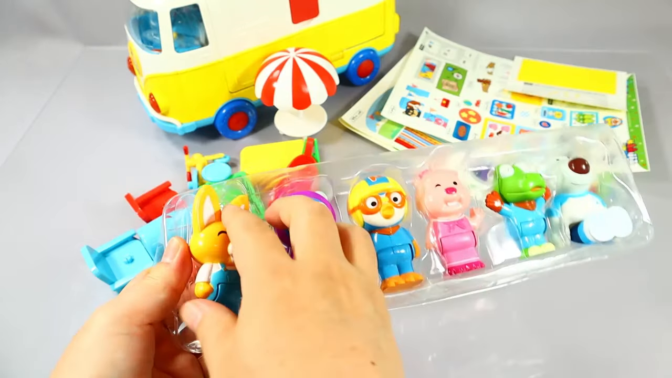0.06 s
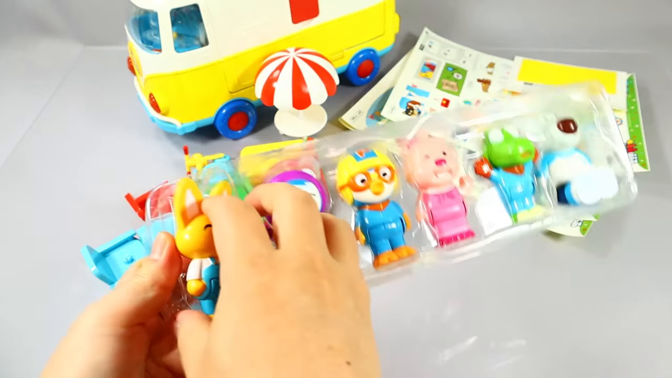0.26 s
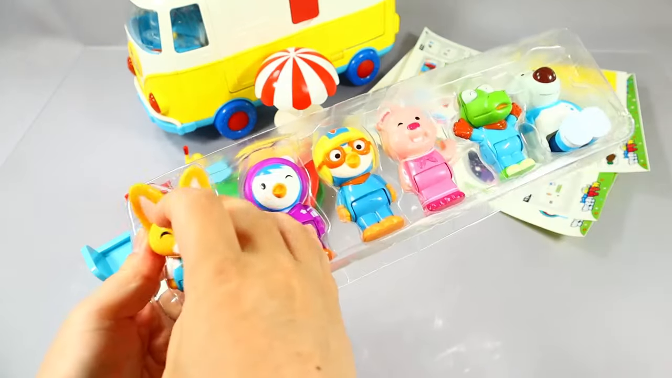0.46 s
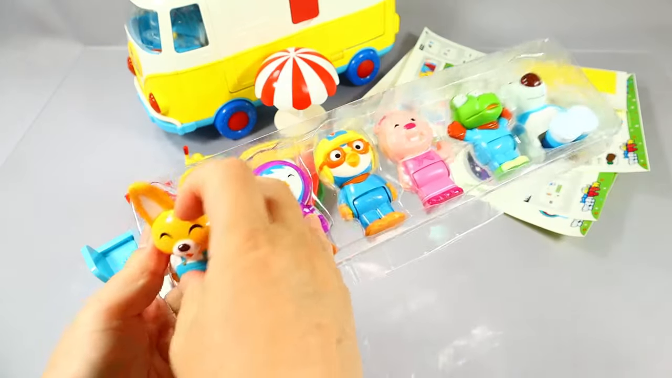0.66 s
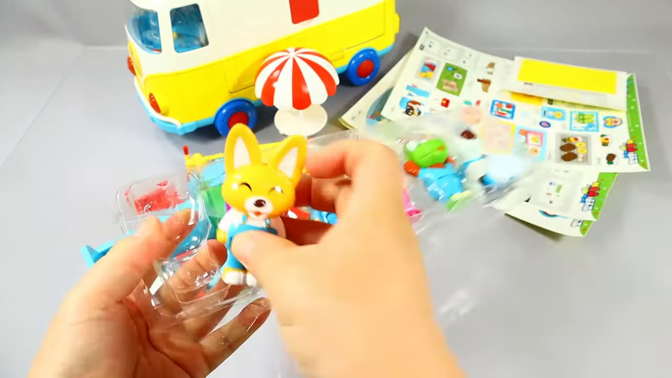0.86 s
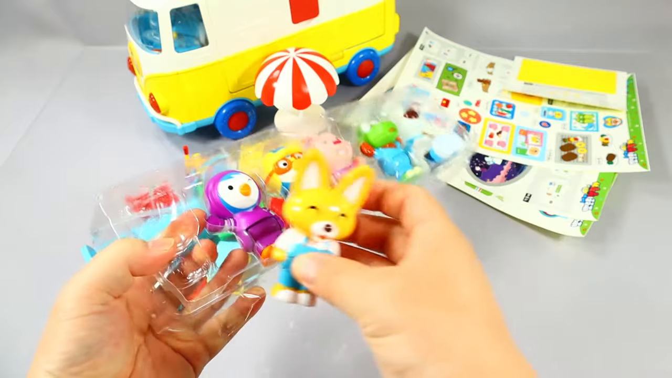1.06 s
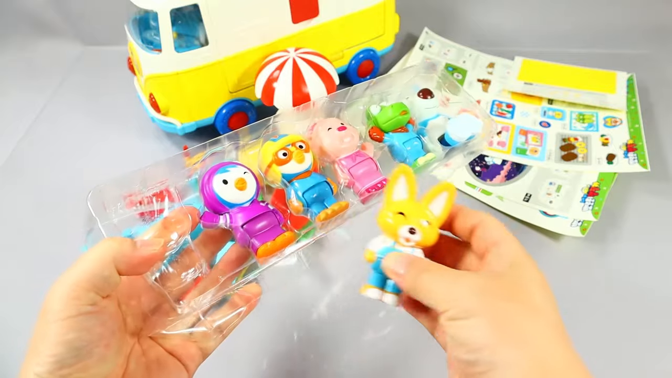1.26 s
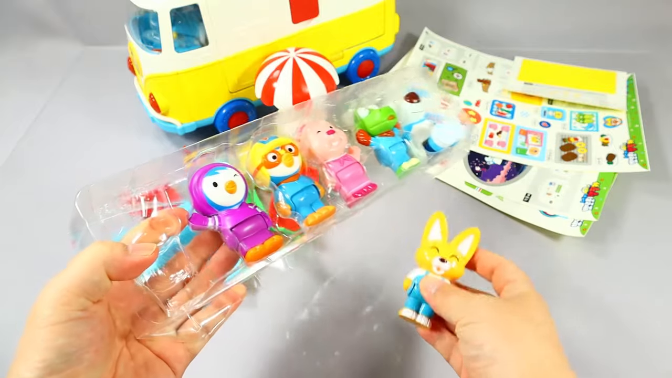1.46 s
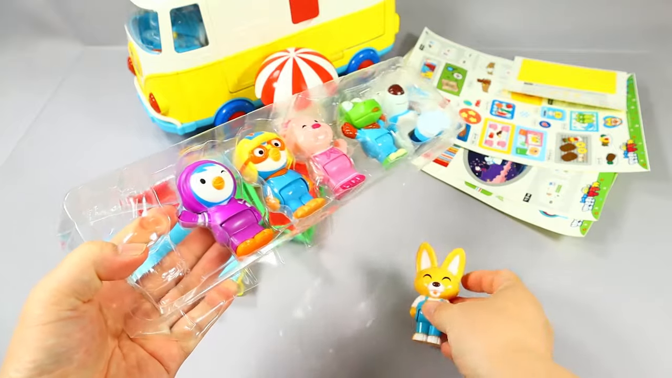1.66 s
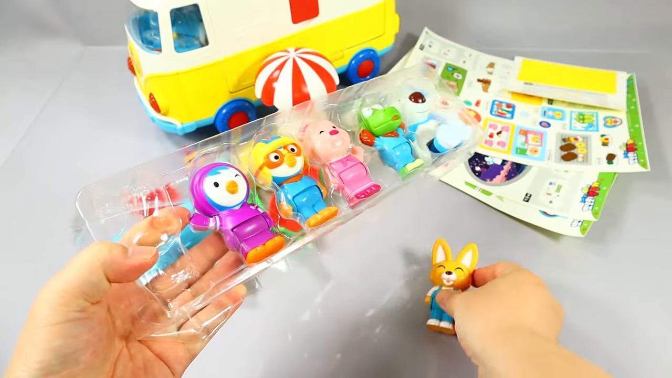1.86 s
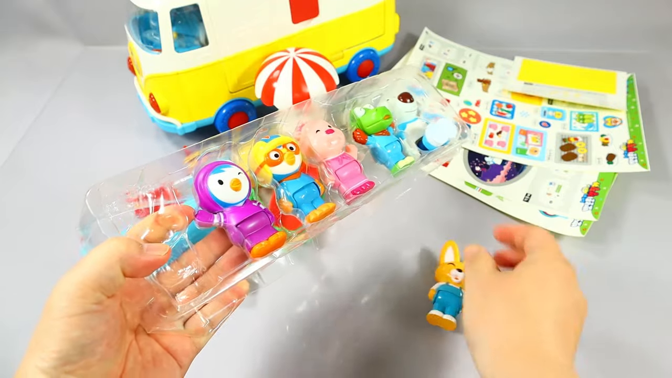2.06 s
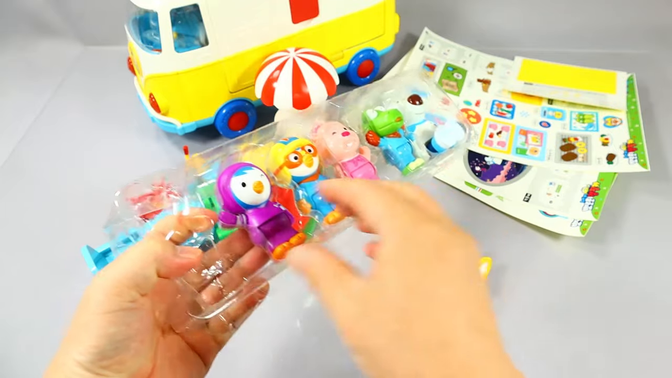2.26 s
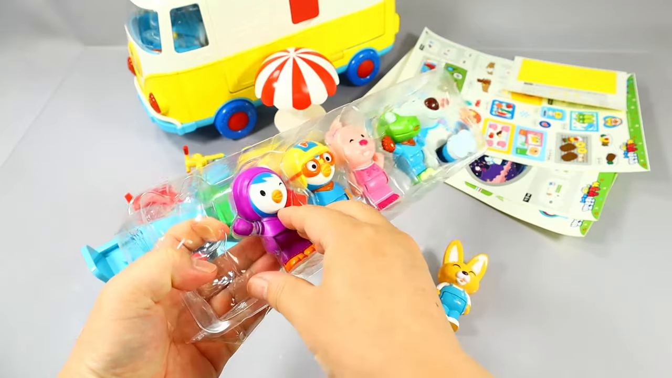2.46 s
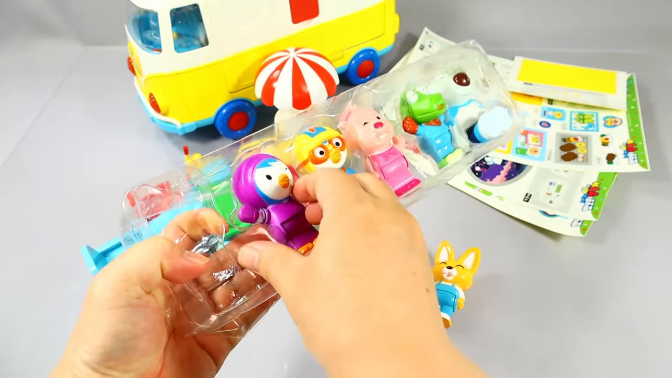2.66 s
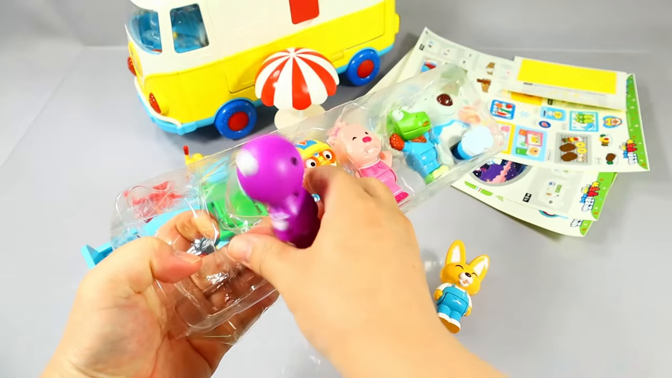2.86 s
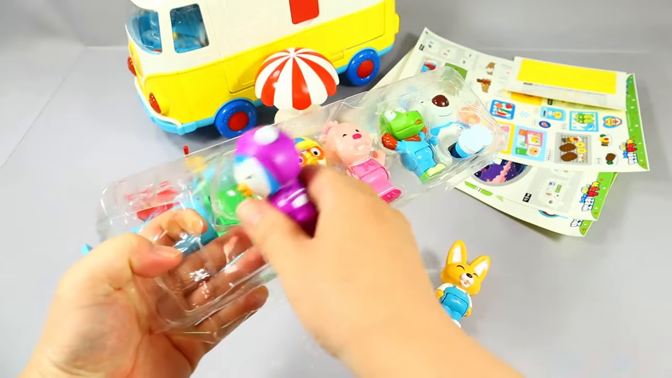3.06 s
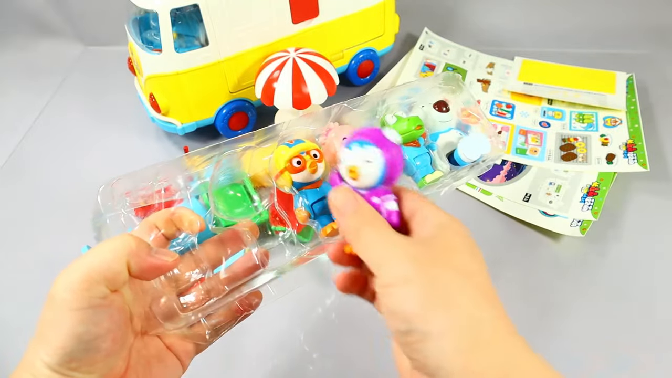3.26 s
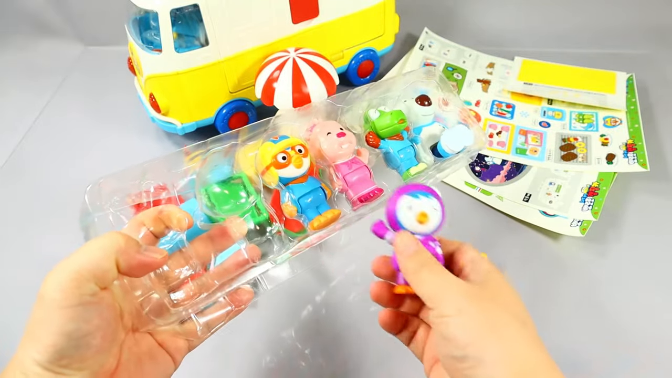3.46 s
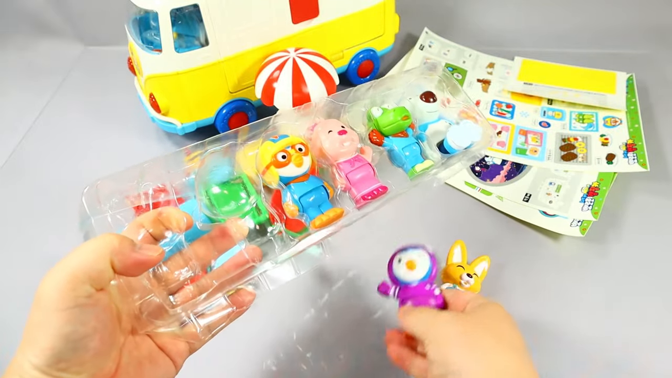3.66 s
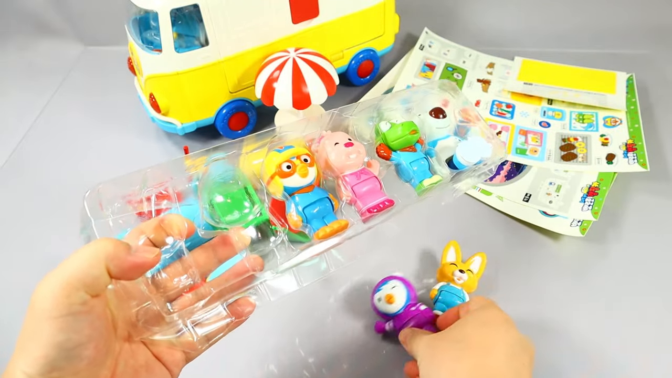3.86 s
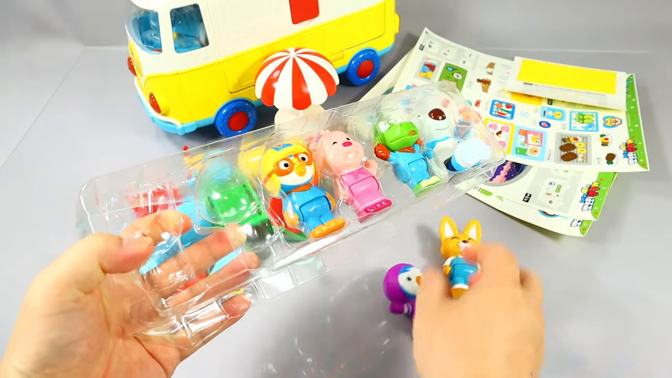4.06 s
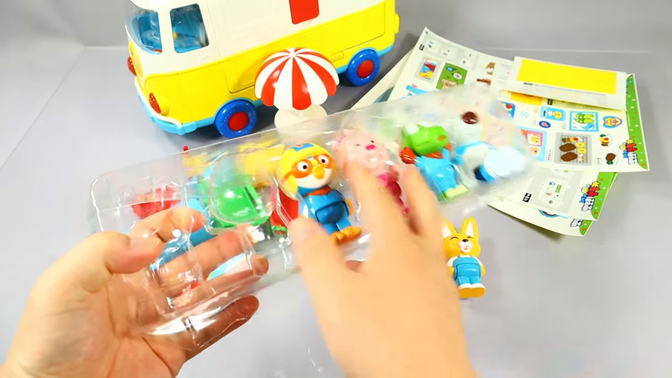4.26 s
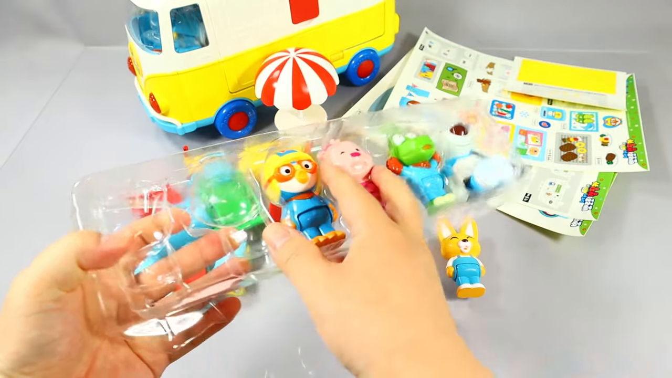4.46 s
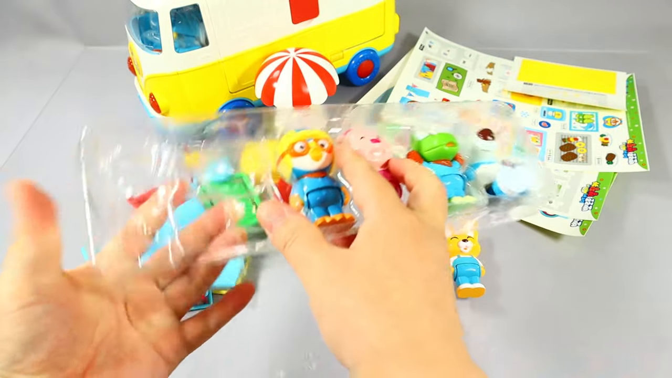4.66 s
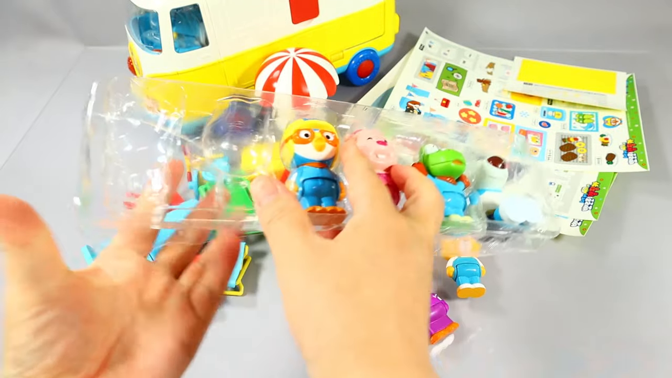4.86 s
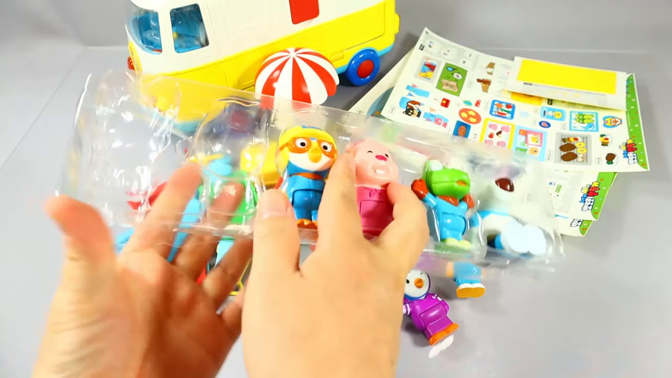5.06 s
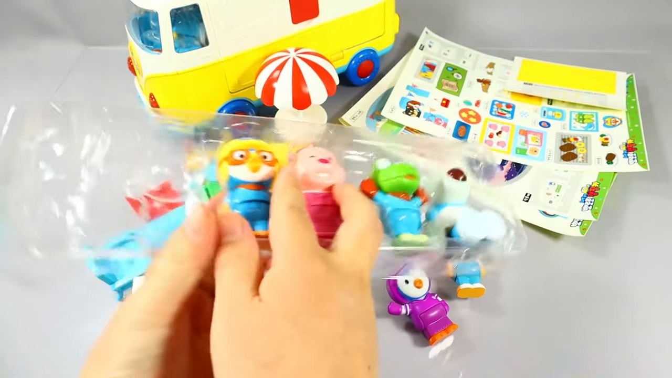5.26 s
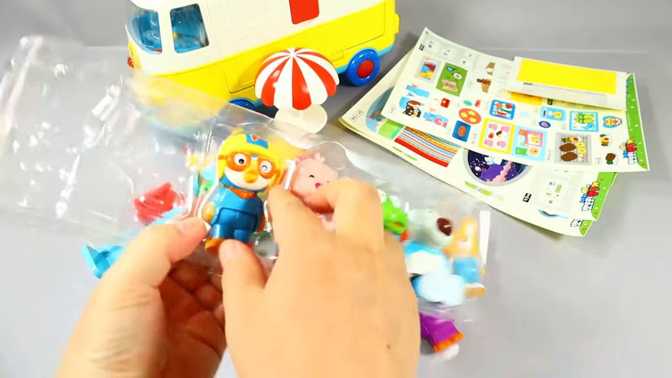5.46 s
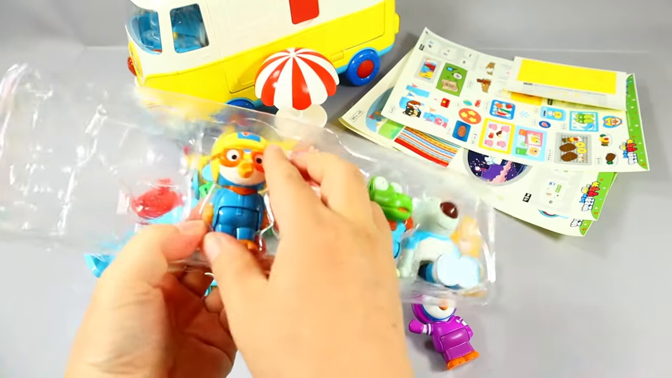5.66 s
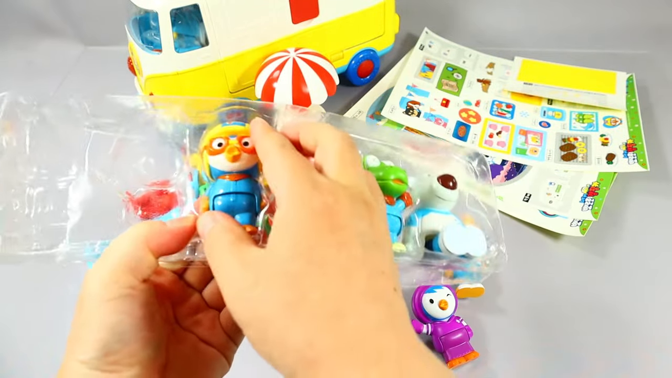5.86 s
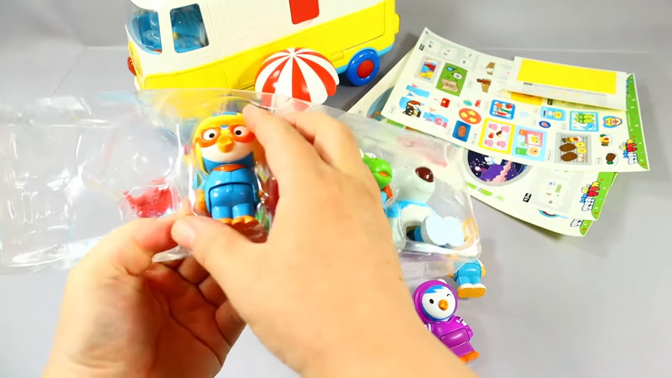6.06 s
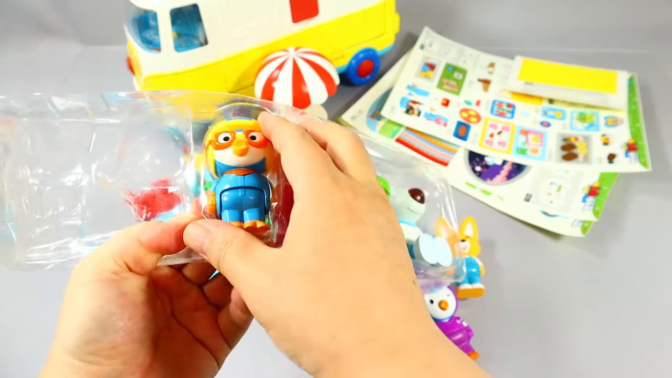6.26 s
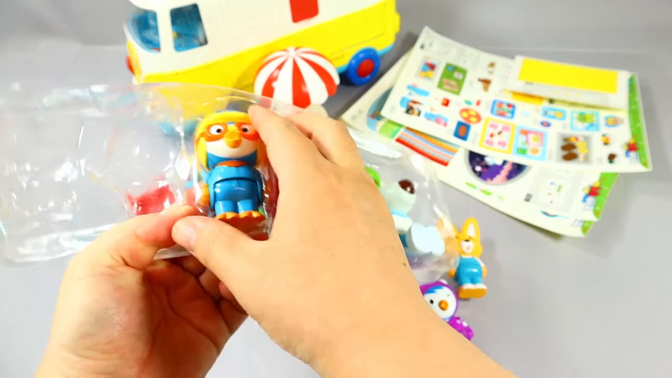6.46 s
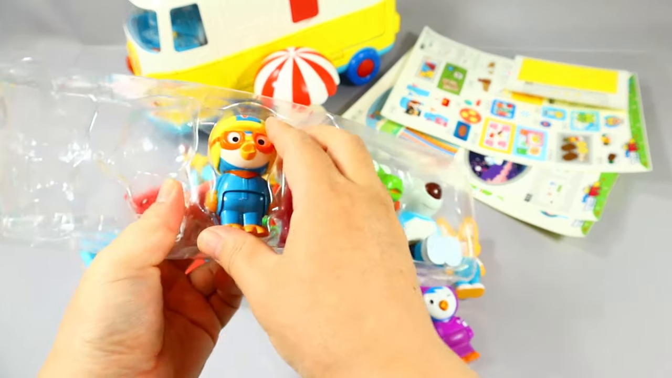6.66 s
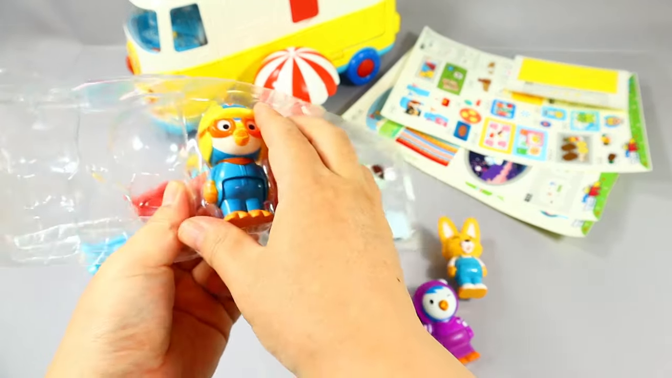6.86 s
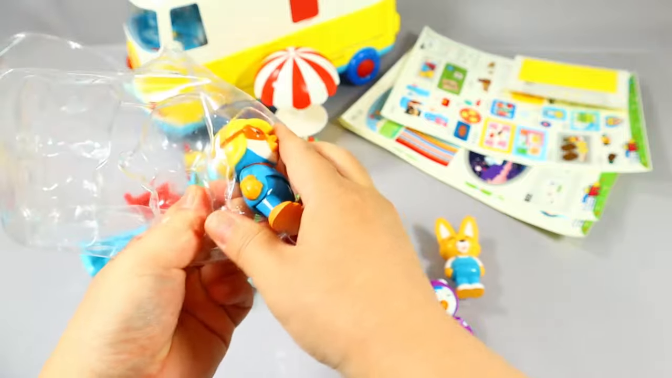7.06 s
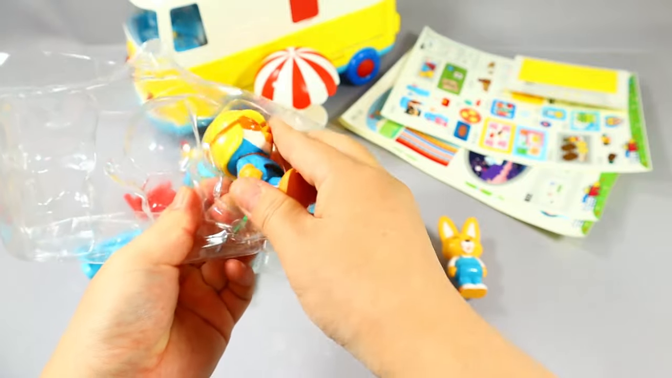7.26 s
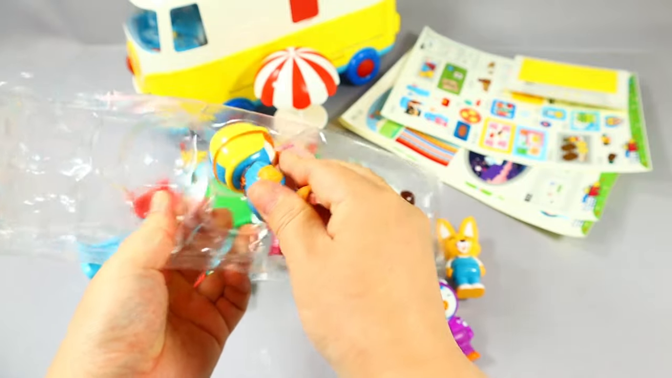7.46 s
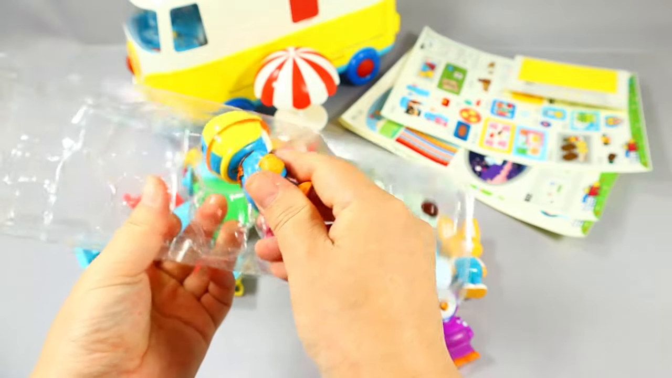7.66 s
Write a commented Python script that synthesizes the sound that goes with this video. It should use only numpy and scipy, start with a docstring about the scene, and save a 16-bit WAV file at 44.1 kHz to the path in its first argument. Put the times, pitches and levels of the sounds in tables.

```python
"""A thin plastic blister tray, flexed in the hands close by, snaps dent by dent as small toys are popped out.
Each snap is a dent's noise and note, a boom of tray modes and a treble crack; close modes add longer rings.
Random grains form a finer crackle that follows the strain; toys knock and slide on a table as modal rings.
A small dry room echoes, above quiet noise and a low hum; two ports listen and the loudest peaks clip."""
import sys
import numpy as np
from scipy import signal
from scipy.fft import rfft, irfft, next_fast_len
from scipy.io import wavfile
from scipy.ndimage import uniform_filter1d

SR = 44100
rng = np.random.default_rng(int(sys.argv[2]) if len(sys.argv) > 2 else 0)


def transcribe(signal):
    """Save signal, clipped to [-1, 1], as a 16-bit WAV file at the path in sys.argv[1]."""
    frames = np.atleast_2d(signal).T
    limited = np.clip(frames, -1, 1)
    pcm = np.round(limited * 32767).astype(np.int16)
    wavfile.write(sys.argv[1], SR, pcm)


N = 339570

# Single dents of the tray: start_s, level_db, pitch_hz, t60_s (bounded below), boom_level_db,
# boom_pitch_hz, crack_level_db
SNAPS = [(0.015, -2.5, 1860, 0.021, -17.5, 430, -11.5), (0.0222, -22, 2380, 0.017, -12.5, 710, -20),
         (0.0296, -14, 2500, 0.016, -20, 730, -8.5), (0.0376, -13, 1680, 0.018, -13, 780, -14),
         (0.0685, -22, 2660, 0.015, -36.5, 690, -30), (0.0714, -22, 2700, 0.011, -14, 716, -18),
         (0.0717, -15, 1110, 0.019, -25, 680, -25), (0.075, -3, 2770, 0.02, -20, 261, -9),
         (0.0778, -17, 980, 0.015, -12, 860, -19), (0.083, -13, 2000, 0.014, -9.5, 850, -24),
         (0.0872, -13, 2500, 0.017, -49, 815, -24), (0.1514, -18.5, 2190, 0.021, -21, 742, -25),
         (0.1609, -15.5, 1430, 0.099, -28, 895, -27), (0.1964, -28, 1760, 0.031, -41, 606, -31.0),
         (0.2176, -28, 1034, 0.017, -19.5, 746, -37), (0.317, -5.5, 2720, 0.01, -14, 696, -20.5),
         (0.3182, -7.5, 1560, 0.018, -20, 900, -27), (0.3307, -16, 1610, 0.012, -28, 794, -32),
         (0.3426, -34, 2880, 0.028, -34, 630, -41), (0.3828, -12.5, 1480, 0.018, -28, 650, -14),
         (0.389, -15, 3420, 0.036, -38.5, 890, -18.5), (0.4005, -30, 1770, 0.021, -26, 740, -36),
         (0.4301, -28, 1710, 0.017, -18.5, 668, -35), (0.4577, -10, 810, 0.01, -26, 500, -26),
         (0.4656, -8, 1880, 0.018, -6, 364, -20), (0.4896, -17, 940, 0.029, -19, 457, -29),
         (0.528, -20, 1820, 0.017, -22.5, 511, -31), (0.5509, -18, 1800, 0.023, -32, 440, -37),
         (0.5571, -5.5, 900, 0.021, -6.0, 640, -33), (0.587, -9.5, 1730, 0.018, -11.5, 581, -23.5),
         (0.717, -37, 2500, 0.012, -46, 790, -48), (0.7295, -32, 900, 0.02, -17, 790, -57),
         (0.739, -38, 900, 0.02, -26, 790, -57), (0.7536, -2.5, 1940, 0.024, -6, 790, -13.5),
         (0.7774, -9, 2300, 0.031, -20, 780, -9.5), (0.787, -11.5, 2950, 0.036, -27, 770, -29),
         (0.832, -7, 2000, 0.016, -12.5, 790, -17), (0.8355, -11, 2400, 0.012, -14.5, 790, -22),
         (0.8414, -14, 2120, 0.025, -36, 740, -18), (0.8644, -13, 2120, 0.017, -17, 710, -28),
         (0.8727, -12.5, 2070, 0.038, -19.5, 780, -11.5), (0.8958, -12.5, 2190, 0.015, -23, 750, -12.5),
         (0.9019, -5.5, 1740, 0.023, -11.5, 717, -11), (1.085, -27, 1120, 0.019, -28, 744, -49),
         (1.0983, -25.5, 1800, 0.019, -23, 680, -38), (1.132, -32, 2600, 0.012, -39, 700, -44),
         (1.1382, -28, 890, 0.019, -23, 780, -40), (1.1428, -24, 905, 0.025, -52, 890, -47),
         (1.1683, -17, 875, 0.014, -21.5, 654, -31.5), (1.2584, -38, 2830, 0.009, -54, 700, -44),
         (1.2995, -40, 2200, 0.012, -44, 700, -48), (1.3123, -23, 2440, 0.017, -23, 630, -42),
         (1.3285, -24, 2090, 0.011, -22.5, 650, -45.0), (1.3537, -32, 2290, 0.021, -45, 680, -44),
         (1.3733, -29, 2370, 0.015, -25.5, 596, -47.5), (1.385, -35.5, 1740, 0.017, -43, 730, -59),
         (1.428, -55, 1970, 0.024, -55, 570, -58), (1.4518, -27, 2280, 0.016, -27, 566, -50),
         (1.489, -29.5, 2940, 0.013, -59, 380, -35), (1.498, -44.5, 2700, 0.028, -53, 457, -52.5),
         (1.5317, -22.5, 1950, 0.01, -38, 790, -34), (1.7564, -22.5, 2200, 0.022, -22, 438, -51),
         (1.845, -31, 970, 0.031, -41, 885, -58), (2.3616, -28, 900, 0.075, -30, 920, -65),
         (2.3925, -33, 1276, 0.023, -32, 675, -58), (2.4329, -18.5, 2000, 0.021, -25.5, 850, -31),
         (2.4739, -20.5, 930, 0.093, -11.5, 496, -29), (2.492, -7, 890, 0.014, -14, 838, -14),
         (2.504, -13, 940, 0.024, -46, 716, -38), (2.5396, -4.5, 1880, 0.027, -10, 840, -10),
         (2.5642, -7, 2250, 0.017, -12.5, 715, -17.5), (2.5729, -9, 1860, 0.03, -18, 810, -16.5),
         (2.6318, -34, 1600, 0.012, -39, 550, -22), (2.6395, -27, 1420, 0.014, -17.5, 600, -39.0),
         (2.6681, -9, 880, 0.036, -8.5, 615, -7.5), (2.7, -8.5, 1710, 0.01, -22, 585, -13.5),
         (2.7107, -15, 2550, 0.028, -20, 600, -37), (2.7263, -1, 1660, 0.0037, -13.5, 770, -15),
         (2.731, -8, 980, 0.019, -43, 690, -15), (2.757, -8, 2350, 0.019, -20, 760, -9),
         (2.7786, -6.5, 930, 0.017, -11, 870, -33), (2.8074, -8, 1930, 0.024, -15, 736, -6.5),
         (2.8461, -6.5, 2500, 0.028, -26, 840, -6), (2.8545, -5.5, 1570, 0.015, -15, 503, -11),
         (2.8583, -9, 2010, 0.014, -14.5, 335, -6.5), (2.865, 0, 1890, 0.018, -16, 440, -6),
         (2.9511, -2.5, 1650, 0.018, -10, 816, -11.5), (2.9969, -32, 1510, 0.019, -17.5, 627, -38.0),
         (3.0258, -24, 2910, 0.018, -29, 667, -17), (3.0543, -18.5, 1910, 0.027, -18, 607, -20.5),
         (3.0616, -9.5, 905, 0.0081, -28, 790, -36), (3.0682, -15, 1850, 0.017, -30.5, 830, -17.5),
         (3.0895, -22, 900, 0.015, -10.5, 368, -25), (3.1, -0.5, 1770, 0.0038, -20, 440, -26),
         (3.1277, -10, 1600, 0.0099, -14, 600, -29), (3.131, -16, 2280, 0.021, -30, 800, -35),
         (3.1511, -24, 900, 0.015, -3.5, 600, -39), (3.1754, -5.5, 2120, 0.011, -10, 776, -11),
         (3.1783, -8.5, 2130, 0.025, -15, 600, -11), (3.1828, -6.5, 1660, 0.013, -6, 625, -26),
         (3.189, -19, 885, 0.015, -33, 880, -8), (3.198, -13, 1670, 0.0064, -23, 600, -32),
         (3.213, -14, 1410, 0.019, -33, 620, -28), (3.3519, -39, 900, 0.02, -46, 780, -42),
         (3.378, -39, 1220, 0.015, -53, 340, -44), (3.3855, -40, 1380, 0.021, -53, 780, -41),
         (3.4042, -15.5, 3850, 0.028, -34, 860, -21), (3.4177, -7, 4000, 0.021, -15, 753, -6.5),
         (3.439, -36, 1920, 0.018, -50, 890, -41), (3.4559, -30, 1840, 0.031, -70, 640, -42),
         (3.587, -54, 950, 0.021, -60, 303, -51), (3.661, -36, 2110, 0.013, -45, 890, -44),
         (3.6827, -26.5, 1800, 0.019, -51, 890, -43), (4.2337, -34.5, 1750, 0.017, -52, 300, -46),
         (4.3227, -33, 2290, 0.022, -42, 550, -56), (4.337, -25.5, 1830, 0.011, -26.5, 790, -45),
         (4.347, -27, 980, 0.039, -25.5, 280, -45), (4.4021, -27, 930, 0.071, -24.5, 590, -42),
         (4.4171, -19.5, 900, 0.014, -15.5, 470, -24.5), (4.4226, -32, 940, 0.014, -34, 456, -34),
         (4.5166, -41, 1770, 0.014, -46, 296, -32), (4.5368, -5.5, 1790, 0.019, -18, 575, -21),
         (4.5644, -35, 900, 0.033, -21, 440, -27.0), (4.5763, -2.5, 1480, 0.022, -8.5, 416, -3.5),
         (4.5822, -5, 2060, 0.011, -18, 635, -29), (4.624, -9.5, 1110, 0.034, -22.5, 780, -21),
         (4.6394, -5, 880, 0.06, -5, 762, -14.5), (4.7439, -17, 905, 0.019, -17, 754, -34),
         (4.7717, -4.5, 1750, 0.034, -4.5, 780, -20), (4.785, -29, 2220, 0.011, -14.5, 413, -46),
         (4.8008, -15, 2190, 0.025, -16, 626, -17), (4.8058, -13, 1370, 0.046, -32, 620, -39),
         (4.8115, -12, 1680, 0.009, -9, 727, -38), (4.8518, -29, 900, 0.017, -25, 640, -41),
         (4.883, -26, 2370, 0.014, -40, 900, -33), (4.9117, -16, 2380, 0.036, -25, 758, -48),
         (4.9391, -7, 2280, 0.019, -32, 880, -14.5), (4.9476, -31, 2960, 0.032, -32, 870, -36),
         (4.9539, -5.5, 1470, 0.025, -20.5, 554, -7.5), (5.0118, -38, 1540, 0.018, -54, 470, -40),
         (5.1241, -30, 1500, 0.025, -30, 554, -44), (5.16, -10, 1420, 0.027, -14.5, 650, -24),
         (5.199, -39, 1080, 0.022, -29, 326, -46), (5.209, -23, 2360, 0.016, -34, 710, -56),
         (5.2136, -31, 1030, 0.039, -37, 890, -61), (5.3515, -27, 1800, 0.036, -25, 714, -42),
         (5.3631, -10, 3230, 0.018, -30, 535, -29), (5.3648, -8, 1450, 0.024, -19, 560, -23),
         (5.3804, -15.5, 1260, 0.03, -21, 600, -38.0), (5.3931, -7.5, 2800, 0.007, -17.5, 395, -15),
         (5.396, -18, 1410, 0.023, -15, 695, -38), (5.403, -26, 2400, 0.015, -17, 690, -42),
         (5.4182, -17, 1210, 0.02, -15, 440, -41), (5.4521, -14.5, 1370, 0.042, -17.5, 700, -48),
         (5.4918, -23, 1140, 0.014, -21.5, 684, -57), (5.497, -30, 890, 0.014, -30, 900, -59),
         (5.531, -29, 1210, 0.057, -22.5, 364, -54), (5.582, -32, 1500, 0.028, -21, 600, -36),
         (5.6145, -17.5, 1530, 0.042, -19, 695, -33), (5.6254, -18, 1200, 0.038, -7, 600, -28.5),
         (5.641, -25.5, 890, 0.039, -17.5, 382, -47), (5.7152, -23, 1250, 0.032, -22, 710, -43.0),
         (5.7302, -8, 1350, 0.022, -4.5, 576, -18), (5.7365, -9.5, 1390, 0.041, -6, 690, -32.0),
         (5.7395, -13.5, 2300, 0.03, -15.5, 600, -35.0), (5.7481, -9, 1380, 0.016, -16, 710, -14.5),
         (5.754, -24, 1880, 0.024, -37, 935, -26), (5.7583, -3, 920, 0.015, -23, 920, -18),
         (5.829, -10.5, 1750, 0.039, -6.5, 686, -22.5), (5.8376, -20, 1340, 0.016, -17, 570, -27),
         (5.8624, -5, 1750, 0.02, -13, 402, -14), (5.8654, -6.5, 2610, 0.035, -10.5, 469, -15.5),
         (5.8813, -7, 915, 0.018, -23, 890, -35), (5.903, -18, 1460, 0.02, -34, 535, -17),
         (5.9444, -33, 2590, 0.025, -37, 746, -25.5), (5.953, -27, 2150, 0.022, -28, 530, -31),
         (5.9645, -21, 2800, 0.012, -28, 600, -26), (5.9729, -13, 1410, 0.02, -18, 736, -29.5),
         (5.9879, -7.5, 1870, 0.025, -15.5, 430, -12), (6.0086, -9.5, 1380, 0.023, -27, 660, -36),
         (6.036, -20, 2120, 0.015, -28, 503, -23), (6.0398, -16.5, 2090, 0.028, -25, 487, -18),
         (6.048, -19, 1650, 0.025, -37, 460, -26), (6.1193, -8, 1890, 0.021, -23.5, 580, -19),
         (6.1361, -9.5, 2330, 0.019, -19.5, 780, -13.5), (6.1581, -18, 2250, 0.017, -28, 570, -35.0),
         (6.1685, -11, 1450, 0.028, -18, 575, -33), (6.183, -2.5, 1330, 0.0074, -16, 620, -12.5),
         (6.1932, -13, 1220, 0.034, -26, 790, -20), (6.2576, -20, 2600, 0.013, -36, 705, -34),
         (6.2785, -20, 2300, 0.01, -34, 704, -34), (6.2866, -18, 2190, 0.023, -30, 710, -27),
         (6.2917, -16, 1520, 0.05, -33, 740, -29), (6.308, -12.5, 2290, 0.022, -27, 740, -13),
         (6.3194, -3.5, 1580, 0.013, -15, 420, -12.5), (6.4006, -30, 2200, 0.012, -23, 600, -36),
         (6.421, -14, 1130, 0.037, -16, 770, -20), (6.44, -15.5, 1370, 0.015, -28, 875, -14),
         (6.453, -24, 1000, 0.015, -23.5, 562, -36), (6.461, -24, 2130, 0.028, -22, 595, -17.5),
         (6.4899, -15, 1340, 0.025, -22, 790, -28), (6.5197, -16, 1300, 0.019, -30, 615, -44),
         (6.5603, -30, 2000, 0.007, -36, 700, -42), (6.568, -23, 2620, 0.006, -31, 700, -38),
         (6.578, -21, 1600, 0.0089, -27, 700, -40), (6.6367, -42, 3770, 0.012, -33, 820, -13),
         (6.6442, -31, 1220, 0.028, -23, 610, -41), (6.674, -25, 2400, 0.012, -30, 600, -36),
         (6.6835, -23, 1610, 0.019, -35, 465, -21.5), (6.7026, -28, 3550, 0.012, -40, 700, -28),
         (6.7118, -16.5, 930, 0.02, -9.5, 790, -35), (6.7383, -17, 1530, 0.016, -23, 790, -23),
         (6.7564, -25.0, 2030, 0.028, -42, 790, -33.0), (6.7693, -15, 2050, 0.048, -35, 580, -23.5),
         (6.7858, -23, 1500, 0.03, -23, 900, -31), (6.8204, -34, 1140, 0.015, -18.5, 596, -52),
         (6.8731, -13.0, 2380, 0.014, -49, 546, -15), (6.8922, -3.5, 1430, 0.026, -15, 830, -3.5),
         (6.8981, -17, 1410, 0.011, -20.5, 615, -13), (6.9465, -13.5, 1140, 0.045, -22, 362, -22),
         (6.9572, -15.5, 1470, 0.066, -17, 800, -21.5), (6.984, -24, 1170, 0.017, -19.5, 414, -25),
         (7.018, -34, 3560, 0.01, -32, 600, -17), (7.028, -28, 2220, 0.0087, -31, 736, -16.5),
         (7.044, -20, 1380, 0.018, -41, 590, -24), (7.0603, -19, 2200, 0.013, -31, 700, -32),
         (7.078, -19, 1500, 0.02, -21, 790, -34), (7.0849, -11.5, 1300, 0.03, -16, 814, -27.5),
         (7.0978, -4, 1930, 0.0083, -20, 860, -5), (7.1031, -9.5, 2420, 0.019, -11, 793, -15),
         (7.1116, -9, 1380, 0.023, -10.5, 800, -21), (7.144, -8, 3860, 0.011, -23, 790, -10.5),
         (7.218, -25, 2370, 0.008, -32, 790, -29), (7.2473, -15.5, 870, 0.013, -22.5, 930, -25),
         (7.2566, -21, 910, 0.021, -49, 540, -25), (7.2864, -37, 1840, 0.013, -48, 830, -41),
         (7.332, -37, 2270, 0.043, -38, 300, -33), (7.3445, -28, 3020, 0.008, -46, 700, -27),
         (7.356, -24, 1730, 0.02, -44, 890, -25.5), (7.387, -29, 2600, 0.0094, -44, 690, -29),
         (7.4055, -12, 1410, 0.035, -25, 730, -20.5), (7.432, -40, 1200, 0.031, -50, 800, -27),
         (7.4485, -21.5, 3390, 0.032, -35, 305, -25.5), (7.456, -33, 920, 0.032, -25, 380, -31),
         (7.4733, -28, 2400, 0.04, -34, 420, -30), (7.5404, -3.5, 910, 0.015, -10, 880, -7),
         (7.5462, -4, 3340, 0.011, -30, 816, -11), (7.5726, -7.5, 1450, 0.038, -28, 420, -15.5),
         (7.5788, -17, 1520, 0.017, -35, 507, -20), (7.586, -12, 2800, 0.021, -30, 850, -20),
         (7.6, -9, 1660, 0.01, -16, 545, -34), (7.6136, -12.5, 2500, 0.021, -33, 790, -25),
         (7.654, -21, 2220, 0.015, -38, 566, -29), (7.672, -26, 2340, 0.012, -33, 870, -27.5)]
# Crowded modes of the film: frequency_hz, relative_level_db
FILM_COLOUR = [(500, -8), (900, -0.5), (1800, 4), (2600, 3), (3600, -4), (5000, -17)]
# Modes of the whole tray, before the grip shifts them: frequency_hz, relative_level_db, t60_s
TRAY_MODES = [(152, -31, 0.29), (352, 1, 0.028), (440, 10, 0.026), (600, 20.5, 0.014), (723.3, 5.5, 0.019),
              (790, 8.5, 0.018)]
# Spectrum of a treble crack: frequency_hz, relative_level_db
CRACK_COLOUR = [(3000, 6.5), (4500, 9), (6500, 2.5), (9000, -5.5), (12000, -12), (16000, -26)]
# Rings and low booms after snaps, and the ring of toys clicking on each other: start_s, level_db,
# pitch_hz, t60_s, mode_spread (share of the pitch)
CLOSE_MODE_RINGS = [(0.465, -16, 360, 0.073, 0.091), (.903, -20, 1720, 0.41, 0.068),
                    (3.712, -13, 2127, 0.038, 0.017), (3.999, -31, 2620, 0.093, 0.029),
                    (4.954, -10.5, 1550, 0.27, 0.0374), (4.961, -24, 2020, 0.31, 0.042),
                    (5.83, -23, 150, 0.044, 0.053), (6.183, -10.5, 1250, 0.049, 0.019),
                    (6.319, -18, 1610, 0.15, 0.028), (6.714, -14.5, 790, 0.045, 0.01),
                    (6.944, -17, 371, 0.054, 0.046)]
# Stick-slip runs of film or toy: start_s, length_s, first_gap_s, level_db, pitch_hz
SLIP_RUNS = [(1.22, .055, .0095, -42, 2900), (1.622, 0.11, 0.015, -33, 2330),
             (1.779, 0.05, 0.014, -29, 2250), (6.587, 0.045, 0.0062, -32, 1590)]
# Strain on the tray, heard as the level of the fine crackle: time_s, level_db
STRAIN_CURVE = [(0, -25), (.1, -45), (.16, -28.5), (.27, -46.5), (.45, -28), (.72, -43.5), (.79, -42),
                (.95, -41.5), (1.11, -65), (1.6, -74), (2.01, -63), (2.4, -65), (2.59, -40.5),
                (2.86, -29.5), (3.22, -37.5), (3.5, -85), (3.73, -104), (4.2, -81), (4.37, -52.5),
                (4.6, -35), (4.82, -39), (5.0, -46), (5.3, -61.5), (5.53, -43), (5.73, -43.5),
                (5.86, -29.5), (6.46, -38), (6.73, -34.5), (6.95, -40.5), (7.04, -29.5), (7.1, -28.5),
                (7.18, -37), (7.5, -41), (7.7, -34)]
# Toys knocking on the table or on each other: start_s, level_db, pitch_hz, t60_s,
# toy_ring_db (against level_db), table_thump_level_db, click_level_db, bluntness (0-1)
KNOCKS = [(1.887, -15, 930, 0.047, -12, -23.5, -21, 0.7), (1.927, -20, 1300, 0.033, -20, -21, -32, .8),
          (1.947, -22, 790, 0.032, 7, -28, -34, 0.46), (2.009, -18, 1000, 0.034, -16, -39, -41, 0.5),
          (2.054, -7, 1030, 0.052, -19, -14.5, -23, 1), (2.116, -18, 1230, 0.067, -26, -18.5, -33, 0.96),
          (2.144, -16, 920, 0.026, -7, -20.5, -33.5, 0.5), (3.711, -5, 2190, 0.025, -15, -62, -25.5, 1),
          (3.84, -31, 2060, 0.024, -17, -56, -53, 1), (3.88, -0.5, 960, 0.016, -20, -18.5, -15, 0.89),
          (3.999, -22.5, 1490, 0.055, 0, -38, -31, 0.35), (4.07, -23, 790, 0.032, -9, -30, -28, 0.9),
          (4.084, -4.5, 1200, 0.0072, -20, -21.5, -20, 0.75), (4.141, -17, 1000, 0.014, -37, -28, -35, 1)]
# Spectrum of a blunt contact, at bluntness 1: multiple_of_pitch, relative_level_db
CONTACT_COLOUR = [(.2, -16), (.5, -7), (.8, -1), (1., 0), (1.4, -2), (2., -8), (3.5, -17), (5., -40)]
# Modes of a hollow toy on the table: frequency_hz, relative_level_db, t60_s (shorter when held)
TOY_MODES = [(374, -4.5, 0.024), (663, 4, 0.0034), (790, 4.5, 0.031), (928, 7, 0.07), (1240, 9, 0.012),
             (1800, 10, 0.013), (2120, 0, 0.025), (2250, 2, 0.028), (3320, -9, 0.02), (4370, -6, 0.012)]
# Modes of the table top: frequency_hz, relative_level_db, t60_s
TABLE_MODES = [(136, -7.5, 0.63), (204, -4.5, 0.1), (300, 11.5, 0.031), (360, 8.5, 0.026)]
# Toys sliding on the table: start_s, length_s, level_db (at the start)
SLIDES = [(1.513, 0.19, -37.5), (1.763, 0.063, -38.5), (1.916, 0.05, -35), (2.082, 0.11, -33.5),
          (4.073, 0.094, -37)]
# Decay of the room: frequency_hz, t60_s
ROOM_T60 = [(150, 0.59), (400, 0.31), (2300, 0.24), (6000, 0.19), (14000, 0.75)]
# Echo against direct sound: frequency_hz, level_db
ECHO_LEVEL = [(60, -15), (150, -11), (800, -1), (3000, -4.5), (10000, -11.5)]
# Likeness of the two ports in the echo: frequency_hz, likeness (0-1)
ECHO_LIKENESS = [(60, 1), (700, 0.93), (2000, 0.65), (6000, 0.15), (14000, 0.58)]
# Likeness of the two ports for direct bursts: frequency_hz, likeness (0-1)
DIRECT_LIKENESS = [(300, 0.97), (800, 0.95), (2000, 0.78), (4000, 0.38), (8000, 0.88)]
# Spectrum of the quiet room noise: frequency_hz, relative_level_db (per Hz)
AIR_COLOUR = [(20, -12), (40, -8), (70, -2), (140, 0), (350, 1), (900, -9), (2000, -17), (4000, -22),
              (8000, -38), (16000, -72)]
# Level of the low hum, which swells and then fades: time_s, level_db
HUM_LEVEL = [(0, -68), (.2, -49), (.8, -54.5), (1.9, -57), (2.4, -61), (7.7, -84)]
# Phase by which the left port leads the right: frequency_hz, lead_rad
PORT_LEAD = [(300, .05), (1100, .13), (2000, .42), (3000, .97), (4200, 1.6), (6000, 1.9), (8500, 2.15),
             (12000, 2.8)]

SNAP_PAN_DB, SNAP_PAN_SPREAD_DB = 3.5, 1.5  # the hands work left of the microphone
TONE_DB, TONE_T60_SHARE = -8, .55  # the dent's own clean note against its noise
LEAN_DB_PER_OCTAVE = 17  # how strongly the grip favours the tray mode that booms
SMALL_COUNT = 210
# level at the reference strain, dB per dB of strain, spread
SMALL_DB, SMALL_FOLLOW, SMALL_SPREAD_DB = -29, 0.57, -0.5
SMALL_LOW_HZ, SMALL_HIGH_HZ = 780, 2500
SMALL_T60_S, SMALL_BOOM_HZ = 0.016, 420
SMALL_BOOM_DB, SMALL_CRACK_DB, SMALL_COLOUR_DB = -19.5, -19.5, 9.5  # against the dent, and their spread
# growth of each gap, its random share, spread of level
SLIP_SLOWING, SLIP_JITTER, SLIP_SPREAD_DB = 1.02, 0.05, 2
SLIP_BOOM_DB, SLIP_CRACK_DB = -1.5, -14  # against the dent
MOST_SLIPS = 12  # in one run
STRAIN_DB = -38  # reference strain
CREAK_DB, CREAK_FOLLOW = -40, 0.49  # at the reference strain; dB per dB of strain
RUSTLE_DB, RUSTLE_FOLLOW = -50, 0.83
FINE_SPREAD_DB = 3.0  # a few ticks stand out of the crackle
KNOCK_PAN_DB = 0.5
HELD_T60_S = 0.04  # fingers on the toy stop its ring at least this fast
SLIDE_RISE_S, SLIDE_FALL_S, SLIDE_SAG_DB_PER_S = 0.013, 0.0099, 12
TURN_HZ, TURN_TREBLE_HZ, TURN_SPLIT_HZ = 40, 200, 1800  # speed of the echo's turns below and above the split
AIR_DB, HUM_HZ = -51.5, 37.7
EDGE_HZ = 16300  # upper band limit


def snaps():
    """Superposition: each snap sums a dent, the boom of the whole tray and a treble crack."""
    s, db, hz, t60, boom_db, boom_hz, crack_db = np.vstack([SNAPS, small_snaps(), slips()]).T
    pan_db = SNAP_PAN_DB + SNAP_PAN_SPREAD_DB * rng.standard_normal(len(s))
    sounds = placed(db, pan_db) * dents(hz, t60, lift_db=7.5, width=0.099)
    sounds += placed(boom_db, 0.22 * pan_db) * booms(boom_hz, uneven_db=7.0, soft_s=0.002)
    cracks = bursts(plain(CRACK_COLOUR, len(s)), 0.77 * t60, spike=1.0)
    sounds += placed(crack_db, 0.74 * pan_db) * cracks
    out = np.zeros((2, N))
    add(out, s, sounds)
    return out


def dents(hz, t60, lift_db, width):
    """Buckling: a dent shakes the film's crowded modes, most of all those near its own pitch."""
    octaves = np.log2((np.fft.rfftfreq(2048, 1 / SR) + 1) / hz[:, None])
    colour_db = lift_db * np.exp(-(octaves / width) ** 2) - 2.17 * abs(octaves)
    noise = bursts(plain(FILM_COLOUR, len(hz)) + colour_db, t60, spike=3.83)
    note = rings(hz[:, None], 0, TONE_T60_SHARE * t60[:, None], soft_s=0.00038)
    tone_gain = gain_of(TONE_DB)
    return (noise + tone_gain * note) / np.hypot(1, tone_gain)


def booms(hz, uneven_db, soft_s):
    """Modal selection: the grip bends the tray's nearest mode to the boom's pitch and mutes far ones."""
    mode_hz, db, t60 = np.transpose(TRAY_MODES)
    octaves = np.log2(mode_hz / hz[:, None])
    nearest = abs(octaves).argmin(1)
    bend = octaves[np.arange(len(hz)), nearest][:, None]
    lean_db = LEAN_DB_PER_OCTAVE * abs(octaves - bend)
    db = db - lean_db + uneven_db * rng.standard_normal(octaves.shape)
    return rings(mode_hz / 2 ** bend, db, t60 + 0 * db, soft_s)


def small_snaps():
    """Strain release: lesser dents go at random moments, louder under more strain; rows as in SNAPS."""
    when, pitch, boom = rng.random((SMALL_COUNT, 3)).T
    a, b, c = rng.standard_normal((SMALL_COUNT, 3)).T
    s = (np.arange(SMALL_COUNT) + when) / SMALL_COUNT * (N - 1) / SR
    strain = strain_db()[(s * SR).astype(int)]
    db = SMALL_DB + SMALL_FOLLOW * strain + SMALL_SPREAD_DB * a
    hz = SMALL_LOW_HZ * (SMALL_HIGH_HZ / SMALL_LOW_HZ) ** pitch
    boom_hz = SMALL_BOOM_HZ * 2 ** boom  # within one octave
    boom_db = db + SMALL_BOOM_DB + SMALL_COLOUR_DB * b
    crack_db = db + SMALL_CRACK_DB + SMALL_COLOUR_DB * c
    return np.transpose([s, db, hz, 0 * s + SMALL_T60_S, boom_db, boom_hz, crack_db])


def slips():
    """Stick-slip: a run ticks with slowly growing gaps until its length is spent; rows as in SNAPS."""
    start, length, gap, db, hz = np.transpose(SLIP_RUNS)[..., None]
    a, b = rng.standard_normal((len(SLIP_RUNS), MOST_SLIPS, 2)).transpose(2, 0, 1)
    gaps = gap * SLIP_SLOWING ** np.arange(MOST_SLIPS) * (1 + SLIP_JITTER * a)
    since = np.cumsum(gaps, 1) - gaps
    db = db + SLIP_SPREAD_DB * b - 200 * (since > length)  # silences ticks past the end
    t60, boom_hz = SMALL_T60_S + 0 * a, SMALL_BOOM_HZ + 0 * a
    columns = [start + since, db, hz + 0 * a, t60, db + SLIP_BOOM_DB, boom_hz, db + SLIP_CRACK_DB]
    return np.stack(columns, -1).reshape(len(SLIP_RUNS) * MOST_SLIPS, -1)


def close_mode_rings():
    """Beating: a crowd of close modes interferes, so the ring flutters."""
    s, db, hz, t60, spread = np.transpose(CLOSE_MODE_RINGS)
    close_hz = hz[:, None] * (1 + spread[:, None] * rng.standard_normal((len(s), 16)))
    uneven_db = 1.2 * rng.standard_normal(close_hz.shape)
    sounds = rings(close_hz, uneven_db, t60[:, None], soft_s=0.0022, size=8192)
    out = np.zeros((2, N))
    add(out, s, placed(db, 0 * s + 2) * sounds)
    return out


def crackle():
    """Granular noise: many tiny slips and snaps follow the strain and also shake the whole tray."""
    hz, t60 = np.geomspace(900, 4200, 8), np.full(8, .006)
    low = struck(TRAY_MODES, count=5, detune=0.14, uneven_db=4.5, soft_s=0.001)
    high = bursts(plain(CRACK_COLOUR, count=4), np.full(4, .007), spike=.3)
    ticks = dents(hz, t60, lift_db=1.5, width=0.59)
    fine_gain = gain_of(along(STRAIN_CURVE, column=1))
    fine = fine_gain * grains(ticks[..., :1024], per_s=280, spread_db=FINE_SPREAD_DB)
    rustle_gain = gain_of(RUSTLE_DB + RUSTLE_FOLLOW * strain_db())
    rustle = rustle_gain * grains(high[..., :1024], per_s=480, spread_db=FINE_SPREAD_DB)
    creak_gain = gain_of(CREAK_DB + CREAK_FOLLOW * strain_db())
    creak = creak_gain * grains(low, per_s=300, spread_db=4.0)
    return (fine + rustle) * gain_of([[1.2], [-1.2]]) + creak  # left of centre, creak central


def strain_db():
    """Relative level: strain against its reference at every sample."""
    return along(STRAIN_CURVE, column=1) - STRAIN_DB


def knocks():
    """Impact: a blunt tap excites the hollow toy and the table top, with a click on top."""
    s, db, hz, t60, ring_db, thump_db, click_db, blunt = np.transpose(KNOCKS)
    pan_db = 0 * s + KNOCK_PAN_DB
    colours = []
    for f, b in zip(hz, blunt):
        contact = [(k * f, b * d) for k, d in CONTACT_COLOUR]
        colours.append(plain(contact, count=1))
    held_toy = [(f, d, min(t, HELD_T60_S)) for f, d, t in TOY_MODES]
    ring = struck(held_toy, len(s), detune=.05, uneven_db=2, soft_s=.001)
    thump = struck(TABLE_MODES, len(s), detune=0.012, uneven_db=3.5, soft_s=0.0092)
    click = bursts(plain(CRACK_COLOUR, len(s)), np.full(len(s), .006), spike=3.9)
    sounds = placed(db, pan_db) * bursts(np.vstack(colours), t60, spike=13)
    sounds += placed(db + ring_db, 0 * s) * ring
    sounds += placed(thump_db, 0 * s) * thump
    sounds += placed(click_db, pan_db) * click
    out = np.zeros((2, N))
    add(out, s, sounds)
    return out


def slides():
    """Friction: the toy's feet chatter over the table and keep its hollow body ringing."""
    body = struck(TOY_MODES, count=3, detune=.006, uneven_db=1, soft_s=.0003)
    start, length, db = np.transpose(SLIDES)[..., None]
    t = np.arange(N) / SR - start
    shape = np.clip(t / SLIDE_RISE_S, 0, 1) * np.exp(-np.maximum(t - length, 0) / SLIDE_FALL_S)
    sagging_db = db - SLIDE_SAG_DB_PER_S * np.maximum(t, 0)
    level = (shape * gain_of(sagging_db)).sum(0)
    return level * grains(body, per_s=1300, spread_db=1.5)


def bursts(colour_db, t60, spike):
    """Filtered impulse: a spike and dying noise take one row of colour; the ports' noise differs by band."""
    t, hz = np.arange(2048) / SR, np.fft.rfftfreq(2048, 1 / SR)
    fall = gain_of(-60 * t / np.clip(t60, .003, .06).reshape(-1, 1, 1))
    fall = fall * (1 - np.exp(-t / 0.00024))
    z = rfft(rng.standard_normal((len(colour_db), 2, len(t))) * fall)
    same = np.clip(read(DIRECT_LIKENESS, hz), 0, 1)
    z[:, 1] = same * z[:, 0] + np.sqrt(1 - same ** 2) * z[:, 1]
    # minimum phase keeps the attack sharp
    log_gain = np.log(gain_of(np.maximum(colour_db, -90)))
    mirrored = np.hstack([log_gain, log_gain[:, -2:0:-1]])
    phase = -signal.hilbert(mirrored).imag[:, :len(hz)]
    out = irfft((z + spike) * np.exp(log_gain + 1j * phase)[:, None])
    # the loudest 40 samples set the level
    loudest_power = uniform_filter1d((out ** 2).mean(1), 40).max(-1)
    return out / np.sqrt(loudest_power * 2)[:, None, None]


def rings(hz, db, t60, soft_s, size=2048):
    """Modal decay: dying sines, arrays (events, modes), sum to one sound an event, faded out over size."""
    t = np.arange(size) / SR
    hz, db, t60 = (np.asarray(v)[..., None] for v in (hz, db, t60))
    waves = gain_of(db - 60 * t / np.clip(t60, .003, 1)) * np.sin(2 * np.pi * hz * t)
    window = (1 - np.exp(-t / soft_s)) * np.cos(np.pi / 2 * t / t[-1])
    return peaked(waves.sum(1) * window)[:, None]


def struck(modes, count, detune, uneven_db, soft_s):
    """Modal excitation: grip and struck spot shift and weight the modes anew at each blow."""
    hz, db, t60 = np.transpose(modes)
    a, b = rng.standard_normal((count, len(modes), 2)).transpose(2, 0, 1)
    return rings(hz * (1 + detune * a), db + uneven_db * b, t60 + 0 * a, soft_s)


def grains(shapes, per_s, spread_db):
    """Shot noise: sparse random clicks of uneven size each take one of the shapes."""
    size = gain_of(spread_db * np.minimum(rng.exponential(1, N), 3))
    size = size * (rng.random(N) < per_s / SR)
    size /= np.sqrt(uniform_filter1d(size ** 2, 4000) + 1e-9)  # evens the local power
    which = rng.integers(0, len(shapes), N)
    total = np.zeros((1, N))
    for k, shape in enumerate(shapes):
        clicks = (size * (which == k))[None]
        total = total + signal.oaconvolve(clicks, shape, axes=1)[:, :N]
    return evened(total)


def plain(points, count):
    """Spectral envelope: the same colour for every event, falling steeply outside its table."""
    hz = np.fft.rfftfreq(2048, 1 / SR)
    below, above = np.maximum(points[0][0] / (hz + 20), 1), np.maximum(hz / points[-1][0], 1)
    outside_db = -30 * np.log2(below * above)
    return np.tile(read(points, hz) + outside_db, (count, 1))


def placed(db, pan_db):
    """Level difference: gains of an event at the two ports."""
    return gain_of(db[:, None] + np.outer(np.clip(pan_db, -10, 10), [.5, -.5]))[..., None]


def add(mix, times, sounds):
    """Superposition: mixes each sound in at its time."""
    for s, sound in zip(times, sounds):
        part = mix[:, round(s * SR):][:, :sound.shape[-1]]
        part += sound[..., :part.shape[1]]


def gain_of(db):
    """Logarithmic level: decibels to amplitude gain."""
    return 10 ** (np.asarray(db) / 20)


def evened(x):
    """Power normalization: scales to rms 1."""
    return x / np.sqrt(np.mean(x ** 2) + 1e-20)


def peaked(x):
    """Peak normalization: scales each row to peak 1."""
    return x / (abs(x).max(-1, keepdims=True) + 1e-12)


def read(points, hz):
    """Log-frequency interpolation of a spectrum table."""
    f, value = np.transpose(points)
    return np.interp(np.log(hz + 1), np.log(f + 1), value)


def along(rows, column):
    """Linear interpolation: one column of a curve at every sample."""
    rows = np.array(rows)
    return np.interp(np.arange(N) / SR, rows[:, 0], rows[:, column])


def room(x):
    """Reverberation: three tails of sparse taps take quick turns, each band dying at its own speed."""
    out = np.zeros((2, N))
    # quick turns between the tails spread each tone into sidebands, for a smoother echo
    turn = 2 * np.pi * np.outer([TURN_HZ, TURN_TREBLE_HZ], np.arange(N) / SR)
    low = signal.sosfiltfilt(signal.butter(2, TURN_SPLIT_HZ, fs=SR, output="sos"), x)
    for k in range(3):
        taps = np.zeros((2, 16384))
        at = np.arange(120, 16360, 16) + rng.integers(0, 16, (2, 1015))
        np.put_along_axis(taps, at, rng.choice([-1., 1.], at.shape), 1)
        hz, t, z = signal.stft(taps, SR, nperseg=512, noverlap=384)
        same, t60 = np.clip(read(ECHO_LIKENESS, hz), 0, 1)[:, None], read(ROOM_T60, hz)[:, None]
        z = np.array([z[0], same * z[0] + np.sqrt(1 - same ** 2) * z[1]])
        unit_energy = np.sqrt(t60 * SR / 16 / (2 * np.log(1000)))  # for energy 1 a band
        z *= gain_of(read(ECHO_LEVEL, hz)[:, None] - 60 * t / t60) / unit_energy
        tail = signal.istft(z, SR, nperseg=512, noverlap=384)[1]
        share = np.sqrt(2 / 3) * np.cos(turn + k * np.pi / 3)
        sent = (share * [low, x - low]).sum(0)[None]
        out += signal.oaconvolve(sent, tail, axes=1)[:, :N]
    return out


def air():
    """Partly correlated noise: quiet room noise, nearly alike at both ports, and a wavering hum."""
    hz = np.fft.rfftfreq(N, 1 / SR)
    a, b = rng.standard_normal((2, N))
    noise = evened(irfft(rfft([a + 0.36 * b, a - 0.1 * b]) * gain_of(read(AIR_COLOUR, hz)), N))
    waver = evened(uniform_filter1d(uniform_filter1d(rng.standard_normal(N), 6000), 6000))
    hum = np.sin(2 * np.pi * np.cumsum(HUM_HZ * (1 + 0.0074 * waver)) / SR)
    hum_gain = gain_of(along(HUM_LEVEL, column=1)) * np.sqrt(2)  # levels are rms
    return gain_of(AIR_DB) * noise + hum_gain * hum


def scene():
    """Superposition: tray and toys, their echo and the quiet room."""
    near = snaps() + close_mode_rings() + knocks() + crackle() + slides()
    return near + room(near.mean(0)) + air()


def record(dry):
    """Phase difference and overload: the right port hears the treble late, peaks clip, a band limit follows."""
    size = next_fast_len(N + 4096)
    lead = read(PORT_LEAD, np.fft.rfftfreq(size, 1 / SR))
    turned = rfft(dry, size) * np.exp(.5j * np.array([lead, -lead]))
    ports = irfft(turned, size)[:, :N]
    clipped = np.clip(ports, -1, 1)
    band_limit = signal.firwin(511, EDGE_HZ, window=("kaiser", 9), fs=SR)[None]
    return np.clip(signal.oaconvolve(clipped, band_limit, "same"), -1, 1)


dry = scene()
out = record(dry)
transcribe(out)
```